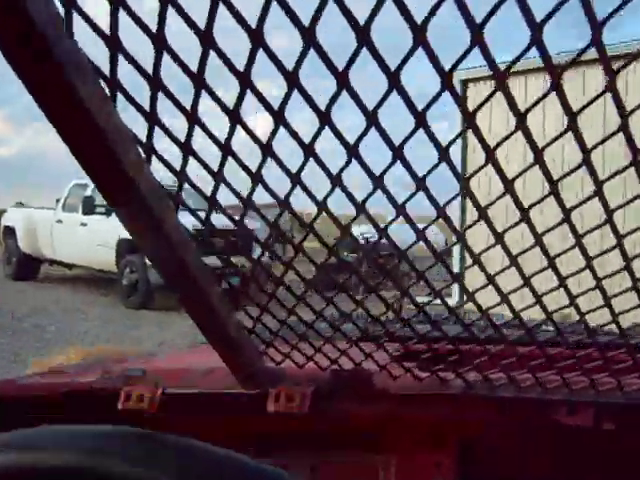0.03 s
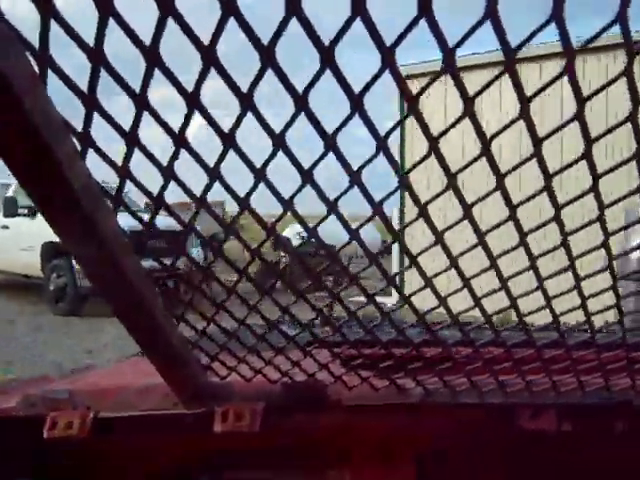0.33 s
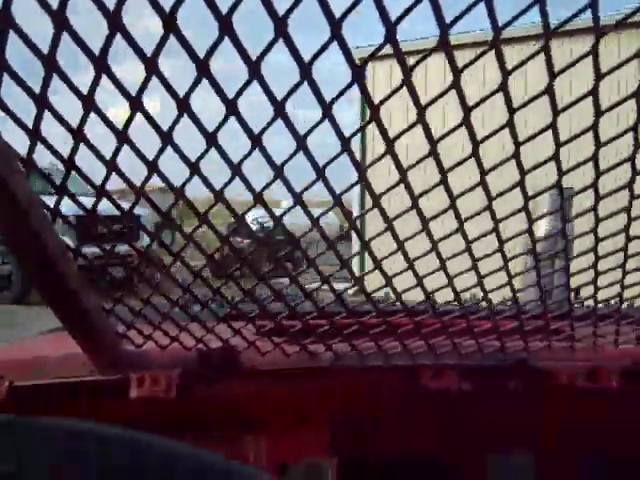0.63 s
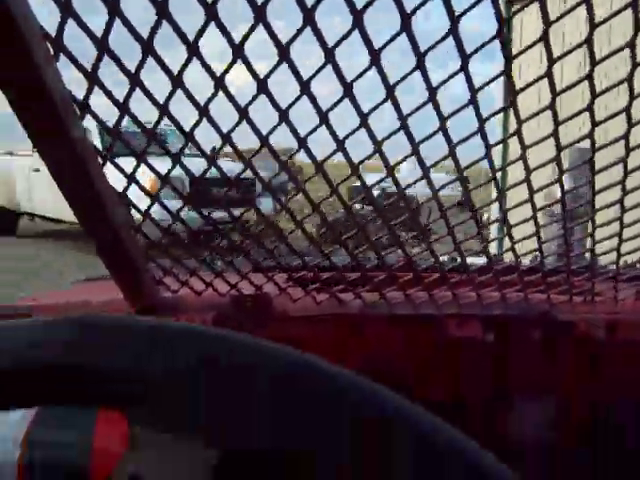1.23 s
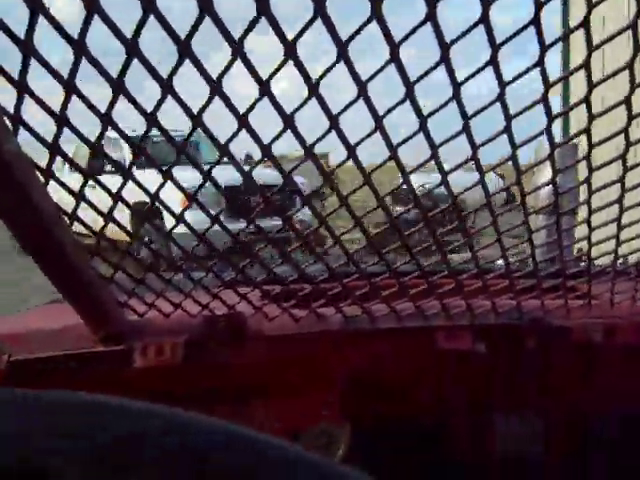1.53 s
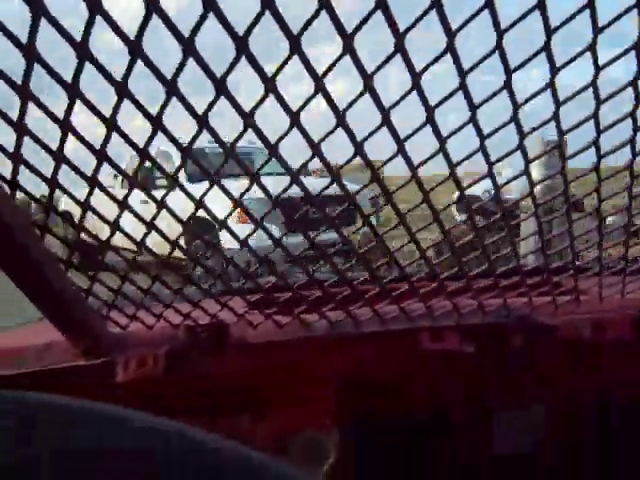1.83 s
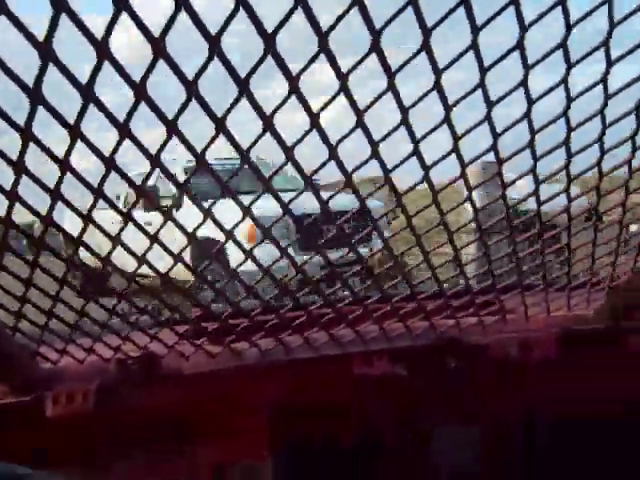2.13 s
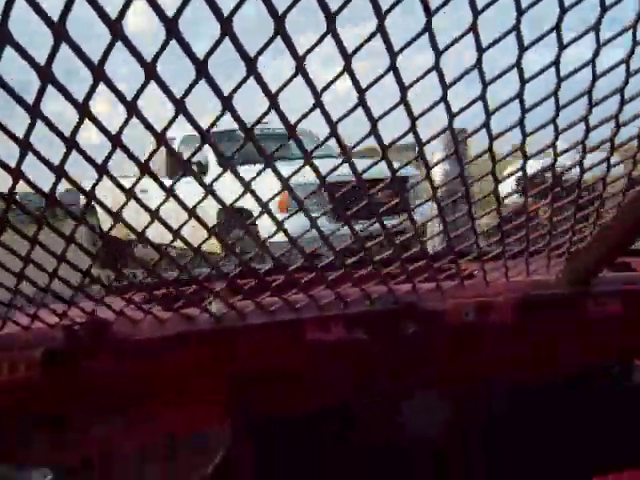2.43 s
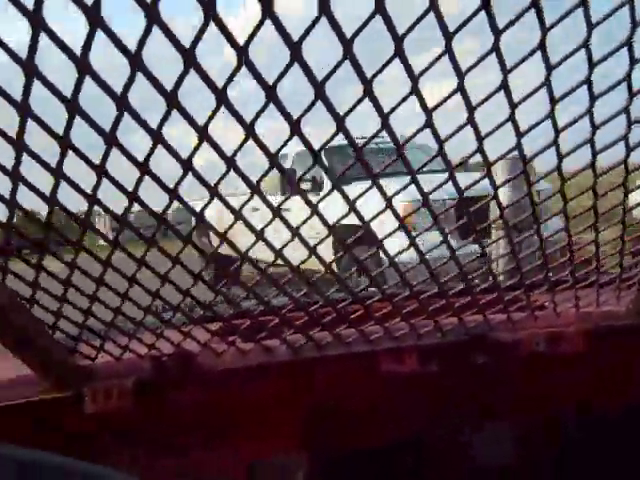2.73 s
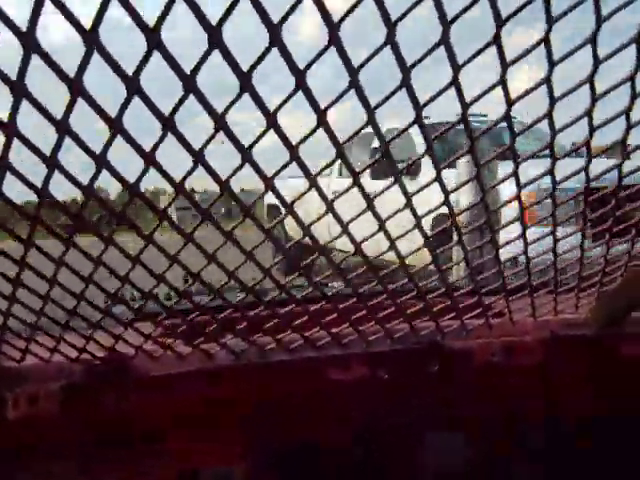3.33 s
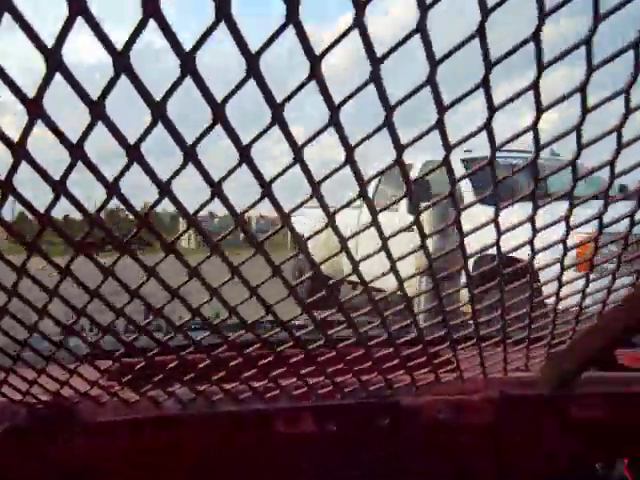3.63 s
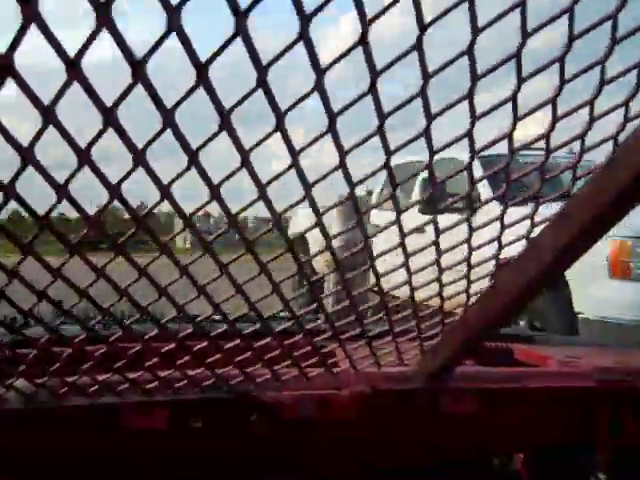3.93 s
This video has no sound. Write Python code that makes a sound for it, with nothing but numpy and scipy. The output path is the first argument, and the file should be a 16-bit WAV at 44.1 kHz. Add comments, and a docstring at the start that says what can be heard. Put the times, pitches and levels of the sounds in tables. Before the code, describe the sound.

A loud, rough car engine with a rasping open exhaust is revved twice, sinks to a throbbing idle, then pulls steadily with one small push. Heard inside the bare metal cabin, with chassis rumble and faint rattles.

```python
"""A low, throbbing drone and a rasping open exhaust, heard inside a four-cylinder derby car's bare cabin.
The throttle is blipped twice; the engine sinks to a low idle, then pulls steadily with one small push.
Each firing excites the resonances of pipe, cabin and panels and releases a turbulent puff of gas;
one cylinder spits more weakly. The chassis rumbles throughout, and later loose steel rattles over bumps."""
import sys
import numpy as np
from scipy import signal
from scipy.fft import rfft, irfft
from scipy.io import wavfile

SR = 44100
rng = np.random.default_rng(int(sys.argv[2]) if len(sys.argv) > 2 else 0)


def dump(signal):
    """Clip the signal to [-1, 1] and save it as 16-bit WAV at the path in sys.argv[1]."""
    limited = np.clip(np.atleast_2d(signal).T, -1, 1)
    pcm = np.round(limited * 32767).astype(np.int16)
    wavfile.write(sys.argv[1], SR, pcm)


N = 176400

# Engine speed. Each row: time in seconds, firings per second.
FIRING_RATE = [(0.0, 30.07), (0.108, 29.84), (0.19, 28.07), (0.273, 29.86), (0.379, 41.19), (0.47, 46.89),
               (0.568, 41.02), (0.733, 39.21), (0.805, 50.26), (0.984, 56.65), (1.039, 54.58),
               (1.204, 35.85), (1.382, 29.93), (1.733, 32.47), (2.565, 32.02), (2.78, 39.02),
               (3.013, 33.62), (3.28, 31.87), (4.0, 37.02)]
# Cylinders in firing order. Each row: rasp level in dB, thump level in dB.
CYLINDER_LEVELS = [(5.66, 0.04), (2, 0.06), (6.8, 0.1), (6.5, -0.05)]
# Misfires and hard firings. Each row: time in seconds, dB added to the rasp, dB added to the thump.
UNEVEN_FIRINGS = [(.137, -25.5, -5.5), (.306, 11.5, 1.5), (.335, 4.5, -3.5), (.385, -1.5, -1),
                  (.455, 3, 3.5), (1.178, -14, -4.5), (1.235, 16, -1), (1.358, -10.5, -7.5),
                  (2.485, 3, -0.5), (2.607, 1.5, -5.5), (2.936, 7.5, -4), (3.299, 1, 1.5), (3.422, 3, -0.5),
                  (3.659, 2, -1), (3.744, 0, -1)]
# Response of pipe and cabin to a thump. Each row: frequency in Hz, gain in dB.
BOOM_RESPONSE = [(18, -44), (33, -19), (52, -2), (65, -6.5), (76, -0.5), (92, -7.5), (111, 7), (131, -1.5),
                 (150, -4), (166, 7.5), (180, 1.5), (194, -19.5), (222, -8.5), (242, -18.5), (258, -13),
                 (300, -31.5), (450, -25.5), (700, -36.5), (1200, -76.5)]
# Noise spectra. Each row: frequency in Hz, relative spectral density in dB.
RASP_SPECTRUM = [(200, -27), (600, -18), (1100, -9), (1900, -10.5), (2500, -1.5), (3200, -3.5),
                 (4200, -1.5), (5300, -4), (6300, -5.5), (7200, -8), (7900, -18.5), (8400, -27),
                 (9000, -41.5)]
ROAR_SPECTRUM = [(25, -9), (100, -9.5), (240, 3.5), (320, -1), (400, 0), (450, 1), (490, -1.5), (535, 7.5),
                 (600, -10), (720, 0.5), (910, -6), (1000, -5), (1300, -10), (2000, -19), (3000, -12.5),
                 (6000, -18.5), (9000, -46.5)]
BARK_SPECTRUM = [(300, -38.5), (700, 6), (1000, -8), (1300, 0.5), (1700, 4.5), (1980, -3.5), (2200, 1.5),
                 (2800, -3.5), (4500, -29), (9000, -57)]
RUMBLE_SPECTRUM = [(12, -13.5), (25, 0.5), (50, -5), (90, -0.5), (200, 3.5), (270, -11.5), (400, -28.5),
                   (900, -62)]
RATTLE_SPECTRUM = [(150, -20.5), (330, -2), (430, 0), (620, -6), (800, -0.5), (1100, -7.5), (1800, -8),
                   (4000, -27), (9000, -64)]
# Level envelopes; the rasp follows the throttle. Each row: time in seconds, level in dB.
BOOM_ENVELOPE = [(0, -17), (.12, -13.5), (.2, -18.5), (.32, -15.5), (.38, -23), (.5, -20.5), (.7, -26),
                 (.8, -21.5), (.98, -26), (1.05, -27.5), (1.12, -27), (1.38, -25.5), (1.57, -19.5),
                 (1.9, -19.5), (2.55, -16), (2.72, -16), (3, -18), (3.28, -18.5), (3.58, -17), (4, -16.5)]
RASP_ENVELOPE = [(0, -24.5), (.17, -27), (.27, -23), (.34, -22.5), (.41, -24.5), (.46, -27), (.51, -37.5),
                 (.68, -39.5), (.73, -26), (.84, -22), (.99, -23.5), (1.06, -35.5), (1.12, -55),
                 (1.38, -51.5), (1.46, -39.5), (1.6, -34.5), (1.95, -32.5), (2.42, -32.5), (2.68, -21),
                 (2.8, -23.5), (2.95, -31.5), (3.25, -33), (3.65, -26.5), (4, -25)]
ROAR_ENVELOPE = [(0, -33.5), (.15, -38), (.27, -34), (.31, -34), (.37, -40), (.5, -42), (.69, -46),
                 (.8, -44), (.98, -33), (1.08, -44.5), (1.2, -52), (1.38, -50.5), (1.55, -41.5), (1.9, -39),
                 (2.5, -36), (2.72, -33), (2.95, -35.5), (3.25, -40.5), (3.6, -35), (4, -34.5)]
BARK_ENVELOPE = [(0.0, -43), (0.05, -32), (0.08, -25), (0.12, -36.5), (0.3, -32), (0.7, -57), (0.72, -38.5),
                 (1.01, -30.5), (1.12, -59), (1.6, -47), (2.57, -39), (2.67, -28), (2.96, -45), (4.0, -30)]
# Modes of the bare body panels. Each row: frequency in Hz, bandwidth in Hz, level in dB.
PANEL_MODES = [(453, 9.3, -3.5), (532.6, 50, -3.5), (791, 34, 2.5), (911, 7.3, -8), (1280, 37, -5.5),
               (1625, 140, -1)]
# Rattles over bumps. Each row: time of the peak in seconds, length in seconds, level in dB.
BUMPS = [(1.785, 0.057, -39.5), (2.267, 0.09, -39.5), (3.074, 0.086, -34.5), (3.558, 0.055, -30.5)]


def amp(db):
    """Decibels to amplitude ratio."""
    return 10 ** (np.asarray(db) / 20)


def unit(x):
    """Normalisation to rms 1."""
    return x / np.sqrt(np.mean(x ** 2) + 1e-20)


def curve(points):
    """Linear interpolation of (seconds, value) points."""
    return np.interp(np.arange(N) / SR, *np.transpose(points))


def colour(x, points, size=16384):
    """Minimum-phase filtering by a (Hz, dB) response, normalised to rms 1."""
    hz, db = np.transpose(points)
    log_hz = np.log(abs(np.fft.fftfreq(size, 1 / SR)) + 1)
    log_gain = np.log(amp(np.interp(log_hz, np.log(hz), db)))
    response = np.exp(np.conj(signal.hilbert(log_gain)))
    taps = np.fft.ifft(response).real[:size // 2]
    return unit(signal.fftconvolve(x, taps)[:N])


def flutter(hz):
    """Random modulation of rms 1, band-limited to hz."""
    passband = np.fft.rfftfreq(N, 1 / SR) < hz
    return unit(irfft(rfft(rng.standard_normal(N)) * passband, N))


def resonate(x, hz, width_hz):
    """Swept resonance whose centre follows the curve hz."""
    carrier = np.exp(2j * np.pi * np.cumsum(hz) / SR)
    r = np.exp(-np.pi * width_hz / SR)
    return (carrier * signal.lfilter([(1 - r) ** 2], [1, -2 * r, r * r], x / carrier)).real


def firings():
    """Quasi-periodic combustion: the rate integrates to a phase, and each whole number is a firing."""
    phase = np.cumsum(curve(FIRING_RATE)) / SR
    number = np.arange(int(phase[-1]) + 1)
    chance = rng.standard_normal((len(number), 3))
    onsets = number + 0.018 * chance[:, 0]  # in firing intervals
    times = np.interp(number, phase, np.arange(N) / SR)
    scatter_db = chance[:, 1:] * [1.4, 0.64]  # rasp, thump
    db = np.array(CYLINDER_LEVELS)[number % len(CYLINDER_LEVELS)] + scatter_db
    for time, rasp_db, thump_db in UNEVEN_FIRINGS:
        db[np.argmin(abs(times - time))] += rasp_db, thump_db
    return phase, onsets, times, amp(db[:, 0]), amp(db[:, 1])


def thumps(times, strength, lead_s=0.003, jitter_s=0.0001):
    """Structure-borne sound: one impulse per firing travels through the body ahead of the hiss."""
    arrivals = times - lead_s + jitter_s * rng.standard_normal(len(times))
    samples = np.round(np.maximum(arrivals, 0) * SR).astype(int)
    return np.bincount(samples, strength, N)[:N]


def boom(pulses, mode_hz=128, width_hz=33.7):
    """Forced resonance: low modes of pipe and cabin spread the pulses into a drone."""
    mode = signal.lfilter(*signal.iirpeak(mode_hz, mode_hz / width_hz, SR), pulses)
    delayed = pulses - 2 * mode  # all-pass: a cabin mode holds back part of each thump
    return colour(delayed, BOOM_RESPONSE) * amp(curve(BOOM_ENVELOPE))


def puffs(phase, onsets, strength, decay):
    """Blowdown: each exhaust valve opens, the pressure falls exponentially, a weaker flow trails off."""
    lead, rise, tail_decay = 0.094, 0.18, 0.77  # in firing intervals, as is decay
    power = np.zeros(N)
    for start, size in zip(onsets - lead, strength):
        a, b = np.searchsorted(phase, [start, start + 2])
        age = phase[a:b] - start
        since_open = np.maximum(age - rise, 0)
        opening = np.sin(np.pi / 2 * np.minimum(age / rise, 1)) ** 4
        tail = amp(-22.5) ** 2 * np.exp(-2 * since_open / tail_decay)
        power[a:b] += size ** 2 * opening * (np.exp(-2 * since_open / decay) + tail)
    return unit(np.sqrt(power))


def rasp(flow, phase, grain_db=1.17, whistle_hz=6035):
    """Jet noise: each puff leaves as grainy hiss, with a whistle that falls as the pressure drops."""
    hiss = rng.standard_normal(N) * flow * amp(grain_db * flutter(hz=684))
    number = phase.astype(int)
    detune = 0.16 * rng.standard_normal(number[-1] + 1)[number]
    hz = whistle_hz * np.exp(detune - 1.85 * (phase % 1))  # the fall restarts at each firing
    whistle = unit(resonate(rng.standard_normal(N), hz, width_hz=1080)) * flow ** 0.9
    jet = unit(colour(hiss, RASP_SPECTRUM) + colour(whistle, RASP_SPECTRUM))
    return jet * amp(curve(RASP_ENVELOPE))


def roar(flow, pulses, steady=3.4):
    """Modal excitation: turbulence and machinery noise throb; gas and thumps ring the damped panels."""
    noise = colour(rng.standard_normal(N) * (steady + flow), ROAR_SPECTRUM)
    t = np.arange(SR // 5) / SR
    ring = sum(amp(db) * np.exp(-np.pi * width * t) * np.cos(2 * np.pi * hz * t)
               for hz, width, db in PANEL_MODES)
    stirred = unit(signal.fftconvolve(rng.standard_normal(N) * flow, ring)[:N])
    struck = unit(signal.fftconvolve(pulses, ring)[:N])
    return (amp(-0.5) * noise + amp(-9) * stirred + amp(-9.5) * struck) * amp(curve(ROAR_ENVELOPE))


def bark(flow, steady=0.39, gain_db=-5):
    """Amplitude modulation: the flow shapes midrange noise into the lower, longer body of each puff."""
    gas = rng.standard_normal(N) * (steady + flow)
    return colour(gas, BARK_SPECTRUM) * amp(gain_db + curve(BARK_ENVELOPE))


def cabin(x, t60_s=0.063, gap_s=0.002, reflected_db=-9.5):
    """Reverberation: short, dense reflections from bare steel follow the direct sound."""
    t = np.arange(SR // 5) / SR
    taps = rng.standard_normal(len(t)) * amp(-60 * t / t60_s) * (t > gap_s)
    return x + amp(reflected_db) * signal.fftconvolve(x, taps / np.linalg.norm(taps))[:N]


def rumble(below_boom_db=15.5):
    """Random vibration: the chassis rolls over gravel, at a level that follows the boom."""
    return colour(rng.standard_normal(N), RUMBLE_SPECTRUM) * amp(curve(BOOM_ENVELOPE) - below_boom_db)


def rattles(grain_db=1):
    """Contact noise: loose steel shakes at each bump, in a grainy burst with a Gaussian envelope."""
    t = np.arange(N) / SR
    shake = sum(amp(db) * np.exp(-((t - peak) / length * 2) ** 2) for peak, length, db in BUMPS)
    chatter = rng.standard_normal(N) * amp(grain_db * flutter(hz=180))
    return shake * colour(chatter, RATTLE_SPECTRUM)


def scene():
    """Superposition: boom, rasp, roar and bark share the same firings, over the noise of the chassis."""
    phase, onsets, times, rasp_gain, thump_gain = firings()
    pulses = thumps(times, thump_gain)
    # The body of a puff varies by a further 1.5 dB, independently of its hiss.
    bark_gain = np.sqrt(rasp_gain) * amp(1.5 * rng.standard_normal(len(rasp_gain)))
    rasp_flow = puffs(phase, onsets, rasp_gain, decay=0.12)
    roar_flow = puffs(phase, onsets, thump_gain, decay=0.31)
    bark_flow = puffs(phase, onsets, bark_gain, decay=0.43)
    body = boom(pulses) + roar(roar_flow, pulses) + rattles() + rumble()
    exhaust = cabin(rasp(rasp_flow, phase) + bark(bark_flow))
    return (body + exhaust)[None]


def record(dry):
    """Soft saturation rounds the loudest peaks; a low-pass filter then limits the bandwidth."""
    ceiling, cutoff_hz = 0.83, 9000
    rounded = dry / (1 + (dry / ceiling) ** 4) ** (1 / 4)
    lowpass = signal.firwin(401, cutoff_hz, window=("kaiser", 9), fs=SR)
    return signal.oaconvolve(rounded, lowpass[None], "same")


dry = scene()
out = record(dry)
dump(out)
```